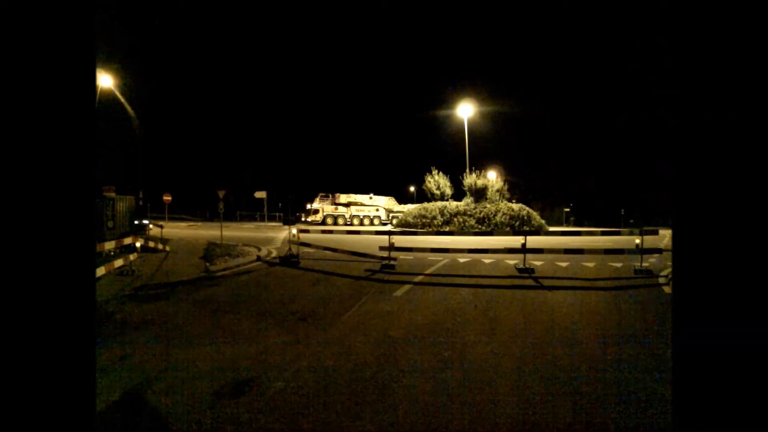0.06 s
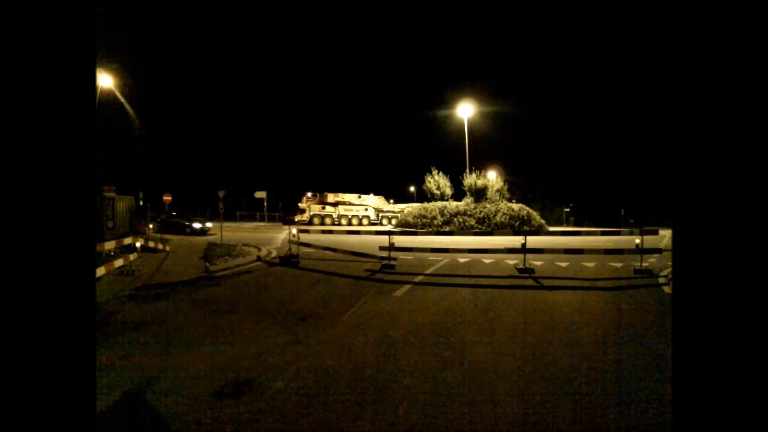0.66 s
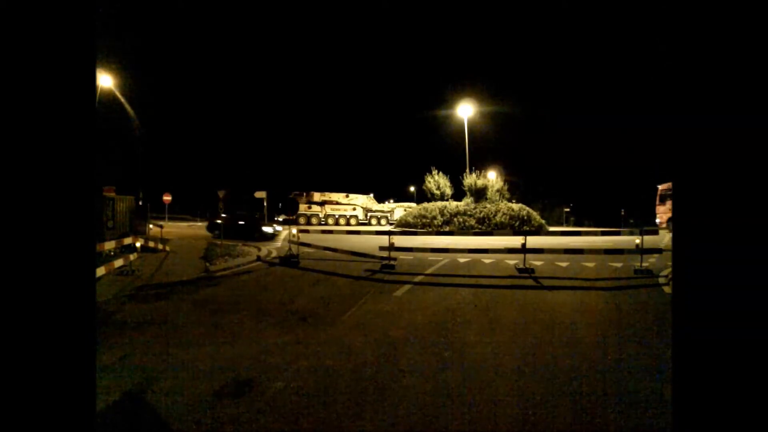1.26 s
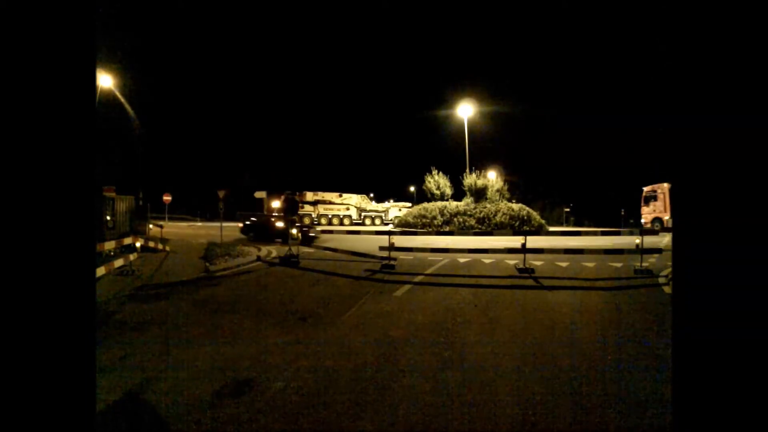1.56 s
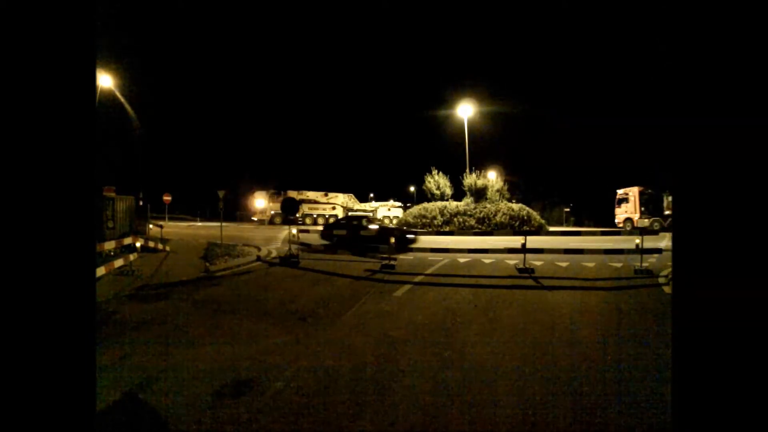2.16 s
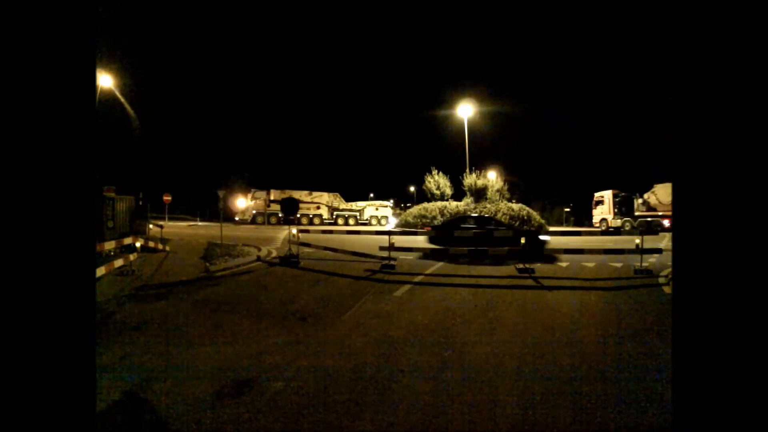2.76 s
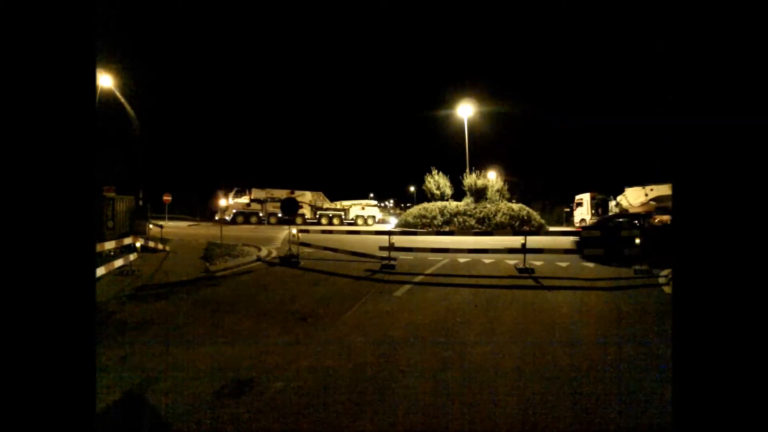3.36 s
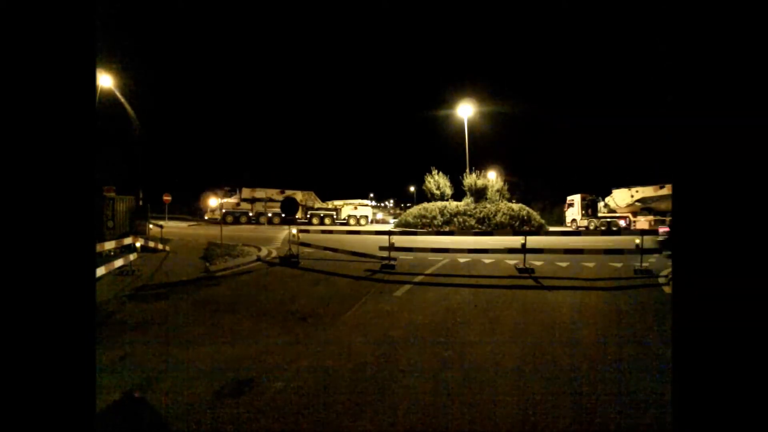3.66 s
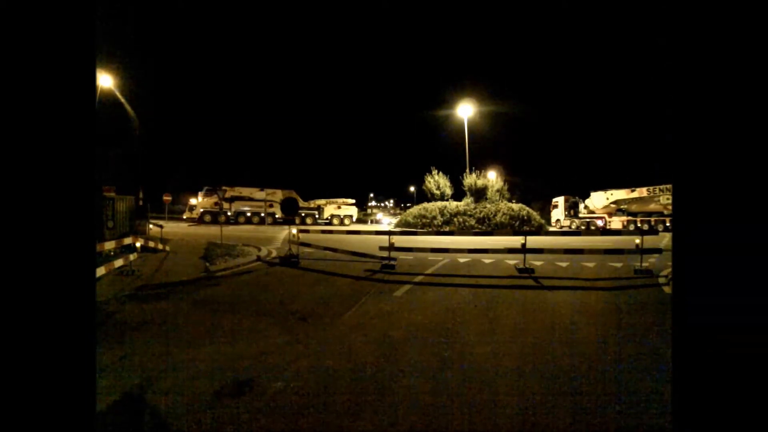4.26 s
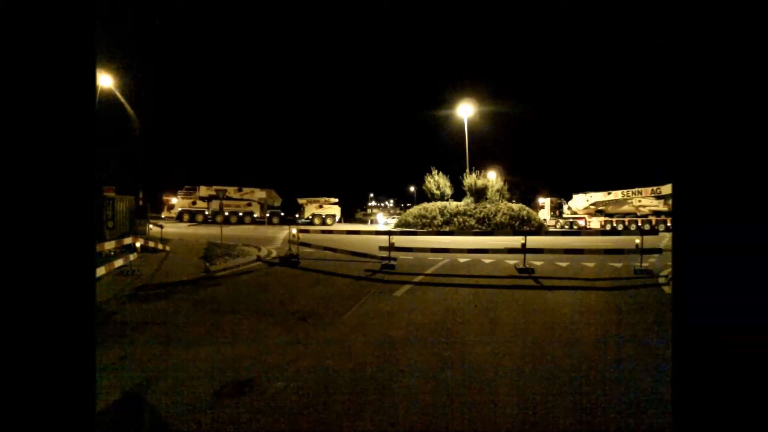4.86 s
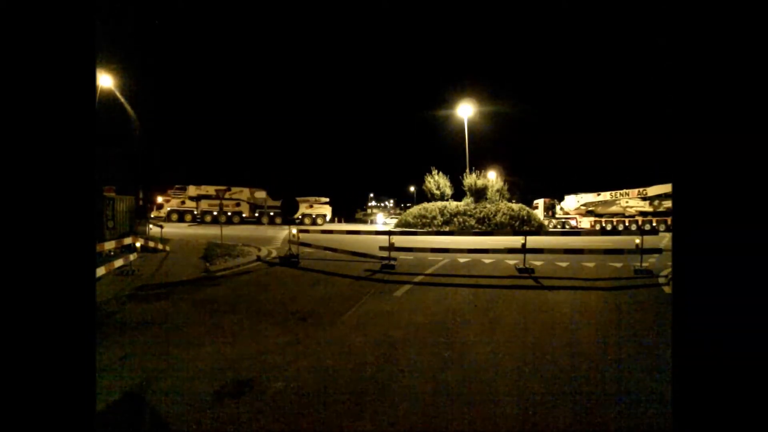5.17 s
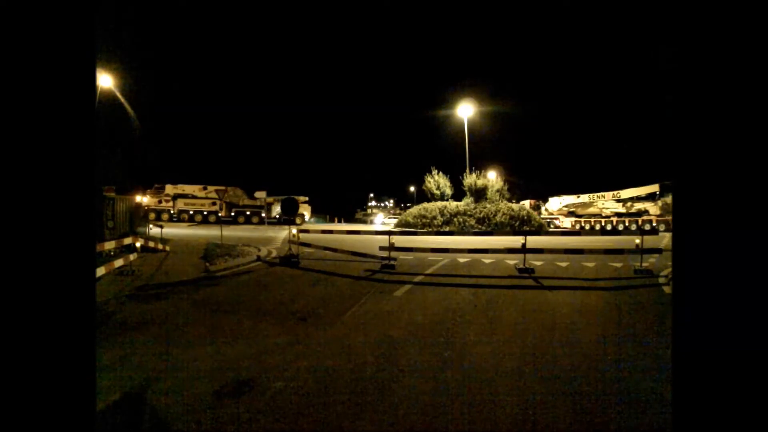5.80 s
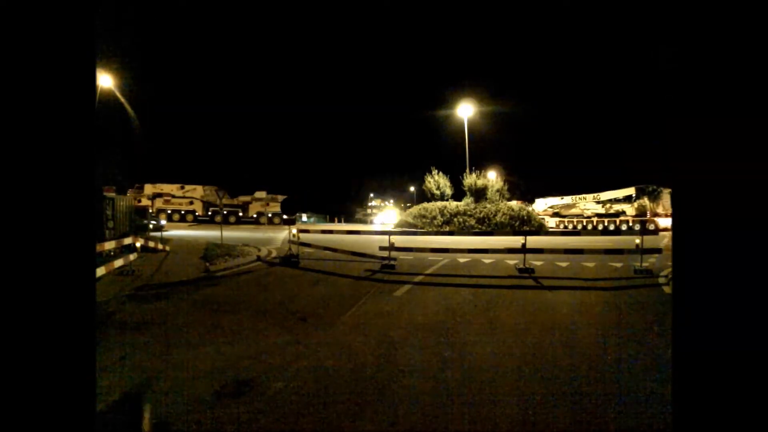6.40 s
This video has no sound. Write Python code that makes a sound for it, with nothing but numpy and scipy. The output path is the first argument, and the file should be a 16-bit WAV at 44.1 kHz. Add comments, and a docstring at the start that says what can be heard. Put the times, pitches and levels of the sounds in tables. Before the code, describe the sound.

A low, uneven diesel drone climbs steadily as a large crane truck accelerates round a roundabout, some distance from the microphone. Rumble and rolling tyres run underneath, with occasional soft hisses from air valves and a very faint turbo whistle. A second truck's hum joins about halfway, and the tyres briefly grow louder. Near the end the engine levels off and softens as it turns away.

```python
"""A roundabout at night: heavy diesel crane trucks pull round it, some tens of metres away.
The nearest V8 engine gathers speed. It fires unevenly, so its exhaust drones and throbs over
rumbling bodies, roaring tyres, clattering engines and the hum of a following truck.
Two turbochargers whistle faintly, gears whine and valves let out puffs of air now and then."""
import sys
import numpy as np
from scipy import signal
from scipy.fft import rfft, irfft, next_fast_len
from scipy.io import wavfile

SR = 44100
rng = np.random.default_rng(int(sys.argv[2]) if len(sys.argv) > 2 else 0)


def store_wav(level_fs):
    """Save 16-bit WAV to argv[1]."""
    pcm = np.round(np.clip(np.atleast_2d(level_fs), -1, 1) * 32767)
    wavfile.write(sys.argv[1], SR, pcm.T.astype(np.int16))


N = 288409
TIME = np.arange(N) / SR


def from_db(db):
    """Turn decibels into a gain to multiply by."""
    return np.exp(np.asarray(db) * (np.log(10) / 20))


def rms_one(x):
    """Scale a signal to an average power of 1."""
    return x / np.sqrt(np.mean(x ** 2) + 1e-20)


def in_time(rows):
    """Join (time_s, value) points with straight lines."""
    return np.interp(TIME, *np.transpose(rows))


def at_hz(points, hz):
    """Read the gain at any pitch from (pitch_hz, level_db) points."""
    pitch_hz, level_db = np.transpose(points)
    return from_db(np.interp(np.log(hz), np.log(pitch_hz), level_db))


def bumps_db(rows, along):
    """Bell-shaped rises and dips in dB, along time or pitch."""
    return sum(db * np.exp(-((along - centre) / width) ** 2) for centre, width, db in rows)


def swells(rows):
    """Gain of smooth swells that rise and fall; their powers add."""
    power = 0
    for peak_s, rise_s, fall_s, level_db in rows:
        width_s = np.where(TIME < peak_s, rise_s, fall_s)
        power += from_db(level_db) ** 2 * np.exp(-((TIME - peak_s) / width_s) ** 2)
    return np.sqrt(power)


def drift(rate_hz):
    """A smooth random wobble of about size 1 that changes about rate_hz times a second."""
    size = next_fast_len(N // 40)
    hz = np.arange(size // 2 + 1) * SR / N
    slow = irfft(rfft(rng.standard_normal(size)) / (1 + (hz / rate_hz) ** 2), size)
    return np.interp(TIME, np.linspace(0, TIME[-1], size), rms_one(slow))


def noise(spectrum):
    """Noise of power 1, shaped by (pitch_hz, level_db) points and fading beyond their ends."""
    size = next_fast_len(N)
    white = rfft(rng.standard_normal(size))
    hz = np.maximum(np.arange(len(white)) * SR / size, 1)
    edges = np.minimum(hz / spectrum[0][0], 1) ** 2 * np.minimum(spectrum[-1][0] / hz, 1) ** 2
    return rms_one(irfft(white * at_hz(spectrum, hz) * edges, size)[:N])


def blurred(angle, width_hz):
    """A tone whose strength and timing wander, smearing it over a narrow band."""
    return rms_one(drift(width_hz) * np.cos(angle) + drift(width_hz) * np.sin(angle))


def passing_tone(peak_s, rise_s, fall_s, level_db, pitch_hz, glide_hz_per_s, width_hz):
    """A blurred tone that swells and fades as its pitch slides."""
    hz = pitch_hz + glide_hz_per_s * (TIME - peak_s)
    return swells([(peak_s, rise_s, fall_s, level_db)]) * blurred(2 * np.pi * np.cumsum(hz) / SR, width_hz)


def nearness_db():
    """The trucks sound louder than average when near and softer when far."""
    # road noise: time_s, level_db
    road_noise = [(0.0, -48), (1.54, -48.5), (1.99, -49), (2.35, -47.5), (4.51, -47), (5.53, -48.5),
                  (6.45, -50.5)]
    level_db = in_time(road_noise)
    return level_db - level_db.mean()


def turn_loss_db(middle_s=4.0752, takes_s=2.296, full_loss_db=4):
    """The truck's body blocks some sound as it turns away."""
    return full_loss_db * np.clip((TIME - middle_s) / takes_s + .5, 0, 1)


def firing_throb(cycle, depth):
    """Engine noise swells with each of the eight firings in a cycle."""
    return rms_one(1 + depth * np.cos(2 * np.pi * 8 * cycle))


def body_rumble(cycle):
    """The truck bodies rumble in time with the firings."""
    # rumble spectrum: pitch_hz, level_db
    rumble = [(18, -21.5), (35, -9.5), (60, -5.5), (120, -5.5), (190, -3.5), (235, -3), (320, -5),
              (400, -10.5), (600, -23.5), (1200, -52)]
    return from_db(-48 + 1.2737 * nearness_db()) * noise(rumble) * firing_throb(cycle, depth=0.473)


def tyre_roar():
    """Tyres roar all the time; their tread noise swells twice as vehicles pass close by."""
    # tyre and tread spectra: pitch_hz, level_db
    tyres = [(200, -26.5), (450, -2.5), (590, 1.5), (700, -1.5), (820, -2), (1110, -5.5), (1280, -10.5),
             (1700, -10.5), (2100, -22), (3200, -38.5), (8000, -45.5)]
    tread = [(500, -25.5), (700, -7.5), (850, -1), (1080, 0), (1300, -10), (1650, -15), (2500, -19.5)]
    # vehicles passing close by: peak_s, rise_s, fall_s, level_db
    passes = [(2.8, 1, 0.6373, -56.5), (4.35, 0.3888, 0.5602, -52.5)]
    rolling = from_db(-51 + 0.8715 * nearness_db() + 0.39 * drift(8.7)) * noise(tyres)
    return rolling + swells(passes) * noise(tread)


def engine_clatter(cycle):
    """Engine blocks clatter, more softly once the truck turns away."""
    # clatter spectrum: pitch_hz, level_db
    clatter = [(1200, 2.5), (1750, 1.5), (2200, -0.5), (2700, 5), (3100, -3.5), (3600, -1.5), (4150, -1.5),
               (4650, -10.5), (5700, -17), (6700, -18), (8000, -34), (10000, -24.5), (12600, -30)]
    level_db = -62.5 + .2 * nearness_db() - turn_loss_db() + 0.64 * drift(16)
    return from_db(level_db) * noise(clatter) * firing_throb(cycle, depth=0.09)


def intake_hiss(firing_hz, db_per_hz=0.0228):
    """Air sucked into the engine hisses more as the firings speed up."""
    # hiss spectrum: pitch_hz, level_db
    hiss = [(4600, -33), (4980, -5), (5200, -3.5), (5400, -2.5), (5700, -11.5), (6600, -15.5),
            (8500, -26.5), (12000, -43.5)]
    speed_db = db_per_hz * (firing_hz - firing_hz.mean())
    return from_db(-71.5 + 0.86 * nearness_db() + speed_db + .5 * drift(14)) * noise(hiss)


def air_valves(flutter_db=0.2741, whistle_db=-18.5):
    """Short, soft jets of compressed air flutter and whistle a little."""
    # jet and whistle spectra: pitch_hz, level_db
    air = [(2000, -4.5), (3200, 0), (4100, 8.5), (4700, -6), (5400, 1.5), (6050, -9.5), (6350, 3.5),
           (6750, -3.5), (7300, -9.5), (8600, -6), (9500, -15.5), (12500, -25)]
    whistle = [(5900, -41.5), (6220, -10.5), (6320, 2), (6430, -24), (6800, -48)]
    # air puffs: peak_s, rise_s, fall_s, level_db
    puffs = [(.02, 0.0504, 0.13015, -61.5), (1.62, 0.0421, 0.05515, -67), (2.01, 0.0838, 0.1101, -68),
             (3.67, .04, 0.034, -73), (3.98, 0.024, .025, -71), (4.301, .1, 0.0995, -84),
             (4.54, 0.082, 0.0946, -65.5), (6.1, 0.02145, 0.1683, -66), (6.252, 0.049, 0.1004, -72.5)]
    jet = from_db(flutter_db * drift(25)) * noise(air)
    return swells(puffs) * (jet + from_db(whistle_db) * noise(whistle))


def far_turbo():
    """A turbocharger farther off gives a faint, rising whistle."""
    # its whistle: peak_s, rise_s, fall_s, level_db, pitch_hz, glide_hz_per_s
    whistle = (1.4939, 2.7453, 0, -89.5, 10650.5, 700)
    return passing_tone(*whistle, width_hz=600)


def near_turbo(firing_hz):
    """The whistle climbs with the engine, levels off, then sags when the driver eases off."""
    # a brief dip in level: middle_s, half_length_s, change_db
    dip = [(1.85, 0.52, -6)]
    low_hz, top_hz = 7074.5, 10363
    half_boost_hz, boost_span_hz = 82.318, 8.3   # firing rates
    ease_off_s, sag_hz_per_s, fade_db_per_s = 5.42, 620, 10.5
    boost = (1 + np.tanh((firing_hz - half_boost_hz) / boost_span_hz)) / 2
    eased_s = np.maximum(TIME - ease_off_s, 0)
    pitch_hz = low_hz + (top_hz - low_hz) * boost - sag_hz_per_s * eased_s
    fade_in = np.minimum(TIME / 0.63, 1)
    gain = fade_in * from_db(-87 + bumps_db(dip, TIME) - fade_db_per_s * eased_s)
    return gain * blurred(2 * np.pi * np.cumsum(pitch_hz) / SR, width_hz=210)


def timing_gears(cycle):
    """Thin gear tones climb with the engine; reflections make them fade in and out."""
    # gear tones: waves_per_cycle, level_db
    gears = [(61, -65), (70, -68), (78, -74.5), (85, -67), (97, -67.5), (110, -69.5)]
    tones = sum(from_db(db) * blurred(2 * np.pi * waves * cycle, width_hz=11.996) for waves, db in gears)
    return from_db(nearness_db()) * tones


def gearbox_whine():
    """Gearboxes whine, each swelling and fading as its pitch creeps up."""
    # whines: peak_s, rise_s, fall_s, level_db, pitch_hz, glide_hz_per_s, width_hz
    whines = [(1.549, 1.344, .4, -70, 1797, 52, 40), (4.45, 0.58, 1.444, -64.5, 1457, 9, 48)]
    return sum(passing_tone(*row) for row in whines)


def following_truck():
    """The exhaust of a truck behind hums one slowly rising note."""
    # its note: peak_s, rise_s, fall_s, level_db, pitch_hz, glide_hz_per_s
    note = (4.5, 1.7643, 1.0, -55.5, 293.5, 6)
    return passing_tone(*note, width_hz=2.094)


def silencer(pulses, ring_hz=59.245, width_hz=16.077):
    """The box delays sound near its ringing pitch, smearing the pulses but making no pitch louder."""
    radius = np.exp(-np.pi * width_hz / SR)
    poles = [1, -2 * radius * np.cos(2 * np.pi * ring_hz / SR), radius * radius]
    return signal.lfilter(poles[::-1], poles, pulses)


def exhaust_tone(cycle, waves_per_cycle):
    """One tone from one side of a V8, which fires unevenly, on four of the eight beats."""
    firings = np.array([0, 2, 3, 5]) / 8
    phase = np.angle(np.exp(-2j * np.pi * waves_per_cycle * firings).sum())
    return np.sqrt(2) * np.cos(2 * np.pi * waves_per_cycle * cycle + phase)


def exhaust(cycle, cycle_hz):
    """Strong tones beat against each other; shifting reflections make the weak ones waver."""
    # the exhaust swells, then eases as the truck turns: time_s, level_db
    loudness = [(0.04, -41.5), (0.43, -38.5), (2.63, -38.5), (2.77, -37), (2.99, -38), (3.88, -38.5),
                (3.95, -42), (4.72, -40), (5.36, -40), (6.11, -46), (6.45, -44)]
    # strong tones: waves_per_cycle, offset_db, boom_share
    strong_tones = [(5, -2.5, 0.3367), (8, 0.9158, 0.86), (11, -13.5, 0.9632), (13, -8, 0.2533),
                    (16, -20, 0.9735), (19, -21, 0.9391)]
    # pitches where the exhaust lifts or sinks a strong tone: pitch_hz, half_width_hz, change_db
    booms = [(61.03, 4.6, 6), (114.67, 7.011, -21.5), (125.69, 5.53, 11), (171.24, 13.66, 13),
             (233.78, 22, -7)]
    # a reflection briefly cancels the deepest strong tone: middle_s, half_length_s, change_db
    fades = [(.9, 0.216, -10), (5.1, 0.13377, -19), (6.1, 0.1536, -4.5)]
    # weak tones: waves_per_cycle, level_db
    weak_tones = [(3, -55.5), (4, -56.5), (6, -59), (7, -60.5), (9, -59), (10, -56), (12, -58.5),
                  (14, -58.5), (15, -75.5), (17, -62), (18, -58.5), (20, -66.5), (21, -62), (22, -62.5),
                  (24, -64.5), (26, -66), (28, -61.5), (30, -64.5), (34, -64), (37, -69.5)]
    # how the ringing pipe colours the weak tones: pitch_hz, change_db
    pipe = [(26, -5.5), (35, 4), (64, 5.5), (110, 0), (150, -1), (190, 3.5), (230, -4.5), (270, -7),
            (318, 1.5), (360, 1.5), (410, -3.5), (470, 9)]
    pulses = np.zeros(N)
    loudness_db = in_time(loudness)
    drone_db = loudness_db - 1.3007
    for row, (waves, offset_db, boom_share) in enumerate(strong_tones):
        boom_db = boom_share * bumps_db(booms, waves * cycle_hz)
        fade_db = bumps_db(fades, TIME) if row == 0 else 0
        gain = from_db(drone_db + offset_db + boom_db + fade_db + 0.8838 * drift(11))
        pulses += gain * exhaust_tone(cycle, waves)
    swing_db = loudness_db - loudness_db.mean() - .3 * turn_loss_db()
    for waves, level_db in weak_tones:
        gain = from_db(level_db + swing_db + 0.6478 * drift(5.6)) * at_hz(pipe, waves * cycle_hz)
        wander = 0.2182 * drift(0.4734) / waves
        pulses += gain * exhaust_tone(cycle + wander, waves)
    return pulses


def scene():
    """The nearest engine's speed drives its exhaust, gears and turbocharger over the road noise."""
    # engine speed: time_s, firings_per_s
    speed = [(0.1, 70.6), (1.06, 74.3), (2.01, 79.7), (2.95, 87.0), (3.73, 93.2), (4.0, 95.2), (4.99, 99.9),
             (5.73, 101.2), (6.3, 101.4)]
    firing_hz = in_time(speed)
    cycle_hz = firing_hz / 8   # eight firings make one engine cycle
    cycle = np.cumsum(cycle_hz) / SR   # cycles done so far
    exhausts = silencer(exhaust(cycle, cycle_hz)) + following_truck()
    turbos = near_turbo(firing_hz) + far_turbo()
    gears = timing_gears(cycle) + gearbox_whine()
    background = body_rumble(cycle) + tyre_roar() + engine_clatter(cycle) + intake_hiss(firing_hz)
    return (background + air_valves() + turbos + gears + exhausts)[None]


def record(dry):
    """The highest treble is cut off steeply."""
    cutoff_hz = 12750
    return signal.sosfilt(signal.ellip(10, .1, 70, cutoff_hz, fs=SR, output="sos"), dry)


dry = scene()
out = record(dry)
store_wav(out)
```